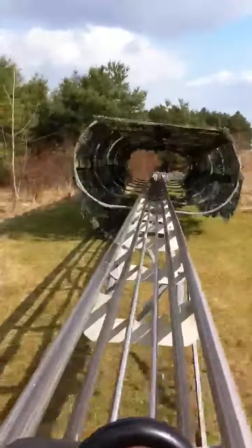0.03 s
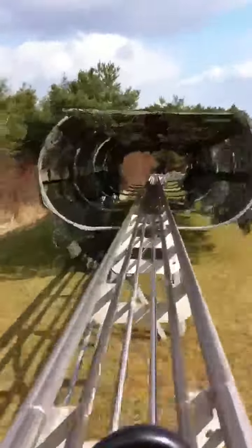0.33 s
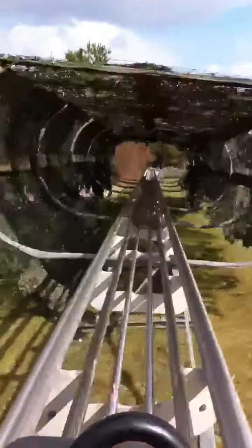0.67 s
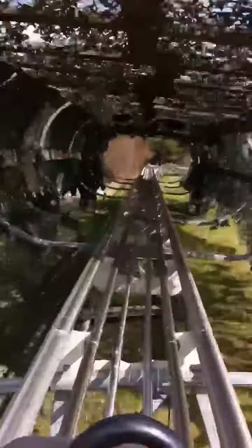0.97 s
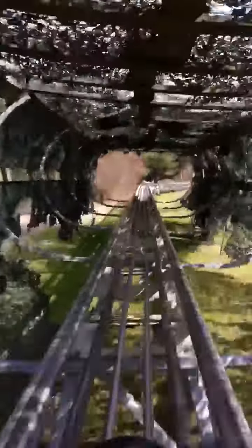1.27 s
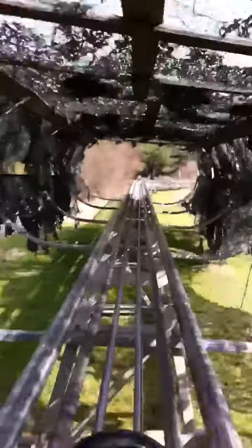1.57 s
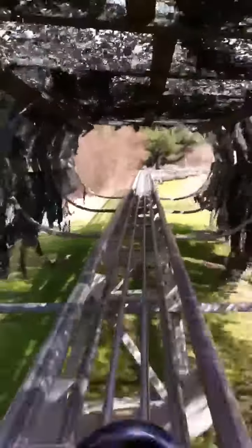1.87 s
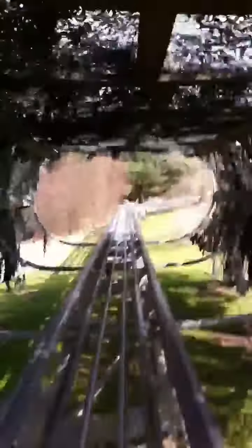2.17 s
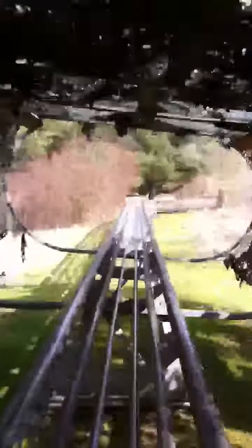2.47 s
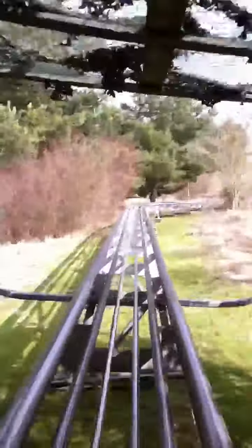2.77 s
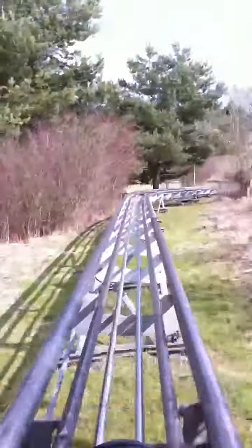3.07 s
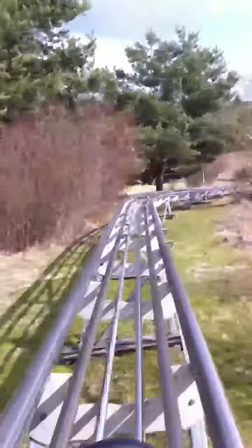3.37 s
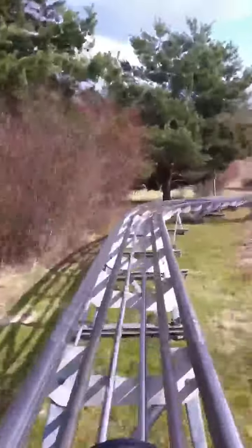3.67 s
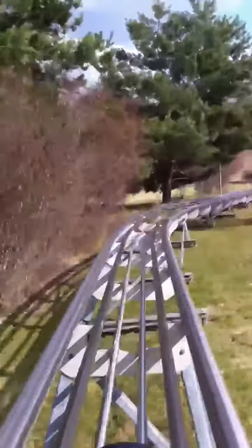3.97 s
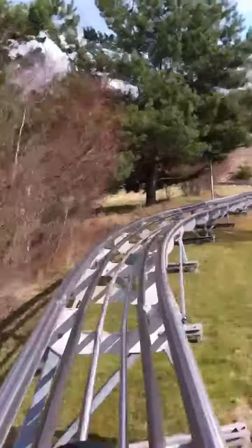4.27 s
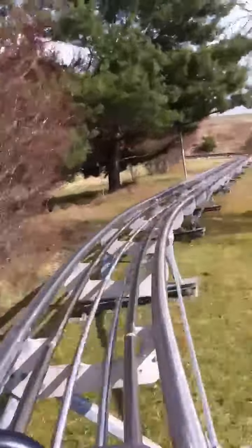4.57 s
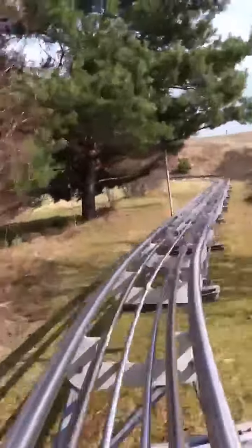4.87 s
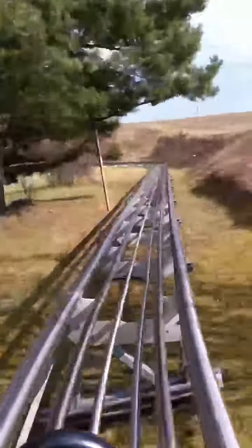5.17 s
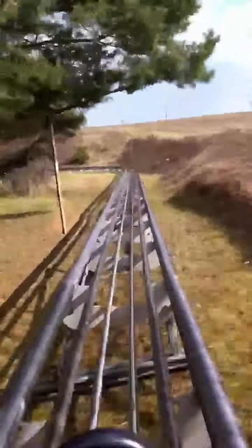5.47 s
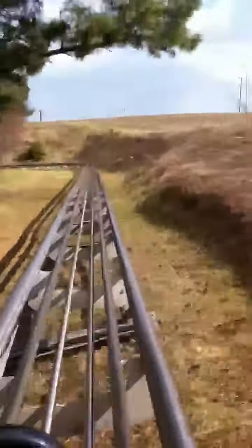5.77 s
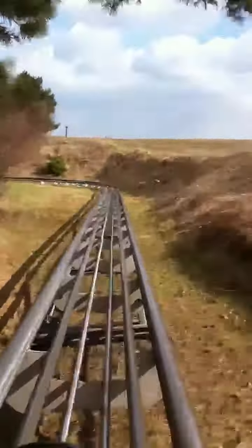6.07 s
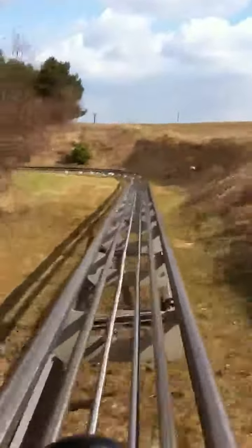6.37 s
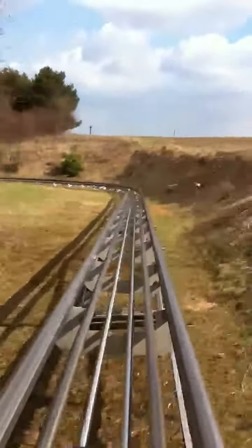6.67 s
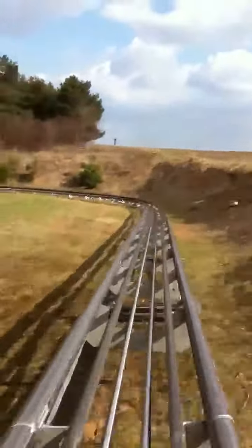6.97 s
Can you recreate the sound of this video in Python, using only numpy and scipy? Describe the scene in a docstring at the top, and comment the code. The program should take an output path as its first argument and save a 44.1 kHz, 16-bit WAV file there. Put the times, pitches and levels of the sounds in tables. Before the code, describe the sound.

Wheels roll along a metal track with a low droning rumble, irregular clacks, small rattles and a light rush of wind.

```python
"""A mountain-coaster sled runs on tubular steel rails, heard from the seat in the open air.
The wheels rumble through the chassis, swelling at each track support, and keep one low mode humming.
The airstream hisses and loose fittings rattle and tick. Bumps and rail joints knock the wheels,
metal pings and squeaks, and a brighter hiss comes and goes as the sled passes under tunnel netting."""
import sys
import numpy as np
from scipy import signal
from scipy.fft import rfft, irfft
from scipy.io import wavfile
from scipy.ndimage import uniform_filter1d

SR = 44100
rng = np.random.default_rng(int(sys.argv[2]) if len(sys.argv) > 2 else 0)


def waveform_to_disk(signal):
    """Save audio, clipped to [-1, 1], as 16-bit WAV at the path in sys.argv[1]."""
    frames = np.transpose(np.atleast_2d(signal))
    scaled = np.clip(frames, -1, 1) * 32767
    samples = np.round(scaled).astype(np.int16)
    wavfile.write(sys.argv[1], SR, samples)


N = 313551
TIME = np.arange(N) / SR

# wheel and chassis resonances: (centre [Hz], width [Hz], lift [dB])
BODY_MODES = [(570, 24, 5), (691, 71, 3.5), (830, 243, 12), (924, 31, 7), (1112, 79, 4.5), (1276, 110, 10),
              (1485, 83, 4.5), (1756, 27, 7), (1925, 66, 4.5), (2270, 110, 0.5), (2594, 100, 3.5),
              (4020, 280, 1.5), (4860, 96, 3.5), (5340, 87, 9)]
# spectrum of a hard contact: (frequency [Hz], gain [dB])
CRACK_SPECTRUM = [(1200, -23), (2500, -0.5), (3800, 14.5), (5500, 5.5), (7000, 5), (9500, 1.5),
                  (15000, -9.5)]


def undb(db):
    """Decibels to gain."""
    return 10 ** (np.asarray(db) / 20)


def unit(x):
    """Scale to rms 1."""
    return x / np.sqrt(np.mean(x ** 2))


def curve(table):
    """(time [s], value) rows interpolated per sample."""
    return np.interp(TIME, *np.transpose(table))


def walk(rate_hz):
    """Random steps, smoothed twice; rms 1."""
    hold = max(int(SR / rate_hz), 1)
    steps = np.repeat(rng.standard_normal(N // hold + 1), hold)
    return unit(uniform_filter1d(uniform_filter1d(steps, hold), hold)[:N])


def colour(x, spectrum, modes=()):
    """Minimum-phase filter of unit power: smooth spectrum plus resonances."""
    size = 8192
    bins_hz = np.maximum(np.fft.rfftfreq(size, 1 / SR), 1)
    hz, db = np.transpose(spectrum)
    octaves_outside = np.maximum(np.log2(hz[0] / bins_hz), 0) + np.maximum(np.log2(bins_hz / hz[-1]), 0)
    gain_db = np.interp(np.log(bins_hz), np.log(hz), db) - 12 * octaves_outside
    for centre_hz, width_hz, lift_db in modes:
        gain_db += lift_db / (1 + (2 * (bins_hz - centre_hz) / width_hz) ** 2)
    cepstrum = irfft(np.log(undb(gain_db)))[:size // 2]
    cepstrum[1:] *= 2
    response = irfft(np.exp(rfft(cepstrum, size)))
    return signal.fftconvolve(x, response / np.linalg.norm(response))[:N]


def impact(spectrum, modes=()):
    """Impulse response of a part; peak 1."""
    response = colour(np.ones(1), spectrum, modes)
    return response / np.abs(response).max()


def grains(rate_hz, spread_db):
    """Tiny impacts of unequal size at random times; rms 1."""
    sizes = undb(spread_db * np.clip(rng.standard_normal(N), -2, 2)) * rng.choice([-1, 1], N)
    return unit(sizes * (rng.random(N) < rate_hz / SR))


def bursts(times_s, levels_db, lengths_s, rise_s, overshoot):
    """Contact envelopes: strike, then decay; weak contacts rise more slowly."""
    power = np.zeros(N)
    for time_s, db, length_s in zip(times_s, levels_db, lengths_s):
        start = max(int(time_s * SR), 0)
        age_s = TIME[:min(SR // 4, N - start)]
        hardness = undb((db - max(levels_db)) / 2)
        attack = 1 - np.exp(-age_s * hardness / rise_s)
        strike = 1 + overshoot * hardness * np.exp(-age_s / .005)
        decay = np.exp(-.5 * (age_s / length_s) ** 2)
        power[start:start + len(age_s)] += (undb(db) * attack * strike * decay) ** 2
    return np.sqrt(power)


def even(x, span_s):
    """Hold the running rms at 1."""
    return x / np.sqrt(uniform_filter1d(x ** 2, max(int(span_s * SR), 2)) + 1e-12)


def hum(load):
    """Rolling sustains a low, nearly pure chassis mode; it flutters more when weak."""
    # hum strength: (time [s], relative level [dB])
    levels = [(0, -22.5), (.25, -25), (.55, -27), (.7, -31), (.95, -37.5), (1.25, -31), (1.55, -43),
              (1.8, -24.5), (2, -27), (2.1, -25), (2.4, -20), (3.7, -17.5), (4.7, -21), (5.5, -22),
              (5.68, -28.5), (6.1, -26), (7.11, -23)]
    # hum pitch: (time [s], frequency [Hz])
    pitches = [(0, 182.5), (.7, 187.3), (2.2, 184.5), (3, 185.6), (4.5, 185.2), (7.1, 186.2)]
    level_db = curve(levels)
    phase = 2 * np.pi * np.cumsum(curve(pitches) + .5 * walk(24.6)) / SR
    flutter_db = (.23 + .095 * (-10.5 - level_db)) * walk(35)
    return np.sqrt(2) * np.sin(phase) * undb(level_db - .24 + flutter_db) * load


def rumble(load):
    """Uneven rails shake the chassis, harder at each evenly spaced track support."""
    # chassis shaking: (time [s], relative level [dB])
    shake = [(0.0, -35), (0.59, -32), (0.73, -33.5), (1.84, -35.5), (2.06, -31.5), (2.49, -31.5),
             (2.97, -33.5), (3.25, -31), (4.47, -33.5), (4.75, -32.5), (5.27, -32), (5.54, -32),
             (6.46, -34), (7.11, -33.5)]
    # deep chassis boom: (frequency [Hz], gain [dB])
    boom_spectrum = [(25, -43), (42, -18), (65, -20), (95, -9), (128, -1.5), (160, 1.5), (190, -3),
                     (300, -38.5)]
    # shell vibration: (frequency [Hz], gain [dB])
    shell_spectrum = [(110, -22), (170, 2), (210, 2.5), (260, -1), (340, -6), (450, -10), (560, -12.5),
                      (700, -21.5), (1500, -52.5)]
    first_support_s, spacing_s, half_width_s = .277, .41, .011
    from_support_s = (TIME - first_support_s + spacing_s / 2) % spacing_s - spacing_s / 2
    swell_db = 7.5 * np.exp(-(from_support_s / half_width_s) ** 2)
    shake_db = curve(shake)
    boom_db = -32.5 + 2.7 * (shake_db + 32) + swell_db
    shell_db = shake_db + 4 + .25 * swell_db
    jolts = undb(walk(30)) * np.sqrt(load)
    boom = colour(rng.standard_normal(N), boom_spectrum)
    shell_modes = [(187, 27, -4.5), (374, 48, 2.5)]  # thinned near the hum's pitch so the hum stays clear
    shell = colour(grains(rate_hz=1500, spread_db=3), shell_spectrum, shell_modes)
    return jolts * (boom * undb(boom_db) + shell * undb(shell_db))


def wheels(roar_db):
    """Rail grit rings wheels and chassis, pulsing once a turn where a wheel presses harder."""
    # rolling roar: (frequency [Hz], gain [dB])
    spectrum = [(250, -31), (500, 9), (700, -0.5), (900, -2), (1010, -4.5), (1400, -4), (2300, -5),
                (3000, -14), (5200, -16.5), (6200, -23), (15000, -58)]
    turn_hz = 17 * (1 + .1484 * walk(6))
    throb_db = np.interp(TIME, [4, 6], [.9, 2]) * np.sin(2 * np.pi * np.cumsum(turn_hz) / SR)
    grit = grains(rate_hz=6000, spread_db=1.5) * undb(roar_db - .16 + throb_db + 1.56 * walk(60))
    return colour(grit, spectrum, BODY_MODES)


def airstream(roar_db):
    """Passing air hisses and flutters; its level follows the wheel roar."""
    # air hiss: (frequency [Hz], gain [dB])
    spectrum = [(1000, -26), (3000, 1), (5200, -12.5), (6500, -3.5), (9000, -7.5), (12300, -8),
                (15500, -17)]
    hiss = colour(grains(rate_hz=24000, spread_db=-2), spectrum)
    level_db = -55.5 + 1.57 * (roar_db + 34.5)
    return hiss * undb(level_db + 2 * walk(25))


def rattles():
    """Loose fittings chatter in short fits, with faint stray clicks between."""
    # fits of chatter: (time [s], level [dB], length [s])
    fits = [(0.011, -44.5, 0.0081), (0.116, -45.5, 0.018), (0.452, -44.5, 0.019), (0.495, -43.5, 0.015),
            (0.848, -48, .01), (2.294, -40, 0.0084), (2.338, -44, 0.017), (2.738, -42, 0.012),
            (2.765, -44.5, 0.027), (3.414, -47, 0.021), (4.094, -51, .035), (4.355, -46, 0.049),
            (5.623, -47.5, .02), (5.728, -41.5, 0.014), (6.002, -43, 0.013), (6.386, -55, .02)]
    clicks = even(grains(rate_hz=1500, spread_db=3), span_s=.02)
    chatter = clicks * bursts(*np.transpose(fits), rise_s=.0003, overshoot=.52)
    strays = grains(rate_hz=45, spread_db=6.5) * undb(-62)
    return colour(chatter + strays, CRACK_SPECTRUM)


def ticks():
    """Small hard parts tick and buzz briefly, some dull, some with a bright snap."""
    # touches of fittings: (time [s], relative level [dB], snap re click [dB])
    touches = [(.0933, -21, 7), (.1572, -29, -6), (0.297, -20.5, -10), (.3673, -30, -14), (.3993, -32, 7),
               (.459, -33, -8), (.488, -29, -18), (.4991, -34, -9), (.555, -35, -18), (0.593, -19, -5),
               (.6134, -24, 2), (0.688, -31, -18), (.8805, -33, -22), (1.0128, -23.5, -13),
               (1.0256, -29, -6), (1.076, -31, -17), (1.1821, -24.5, -17), (1.346, -29, 2),
               (1.4012, -22.5, 8), (2.0919, -21.5, -14), (2.1678, -31, -15), (2.1898, -23.5, 7),
               (2.1993, -27, 3), (2.2923, -20, -8), (2.2941, -22, -6), (2.2985, -22, -8),
               (2.3613, -29, -14), (2.7451, -28, -12), (3.4009, -26, -17), (3.5122, -29, -20),
               (3.5592, -27, -7), (3.5688, -32, -3), (3.6254, -20.5, 4), (3.629, -26, 2),
               (3.8708, -30.5, 2), (4.2044, -25, -6), (4.257, -25, -13), (4.3937, -27.5, -16),
               (5.0102, -26.5, -13), (5.1402, -24, -10), (5.1993, -29, -13), (5.5087, -29, -14),
               (5.6501, -29, -14), (5.7193, -20, -12), (5.8754, -23, 1), (5.9976, -26, -1),
               (6.0098, -30, -10), (6.1528, -28, -18), (6.3913, -28, -26), (6.4121, -29, -28),
               (6.4148, -30, -26)]
    # dull click: (frequency [Hz], gain [dB])
    click_spectrum = [(900, -12), (2000, 1), (3000, -2.5), (4200, 1.5), (5500, -5.5), (7000, -16),
                      (11000, -26), (15000, -44)]
    # bright snap: (frequency [Hz], gain [dB])
    snap_spectrum = [(5800, -23), (7500, 0), (8600, -5), (9900, 2), (12000, -6.5), (13000, -7.5),
                     (15500, -19)]
    pitch_scatter, buzz_db, buzz_decay_s = .056, -17, .0023
    out, age_s = np.zeros(N + SR), TIME[:SR // 60]
    for time_s, db, snap_db in touches:
        jitter = rng.uniform(-1.2, 1, len(age_s))
        detune = [1 + pitch_scatter * jitter[0], 1]
        click = impact(np.multiply(click_spectrum, detune))
        snap = impact(np.multiply(snap_spectrum, detune))
        part = click + undb(snap_db) * snap
        force = (age_s == 0) + undb(buzz_db) * jitter * np.exp(-age_s / buzz_decay_s)
        tick = signal.fftconvolve(part / np.abs(part).max(), force)
        start = int(time_s * SR)
        out[start:start + len(tick)] += undb(db + 2) * tick
    return out[:N]


def contacts():
    """Wheel blows, one per bump, three per joint: front strike, front bounce, rear strike."""
    # rail bumps, relative levels: (time [s], thud [dB], clang [dB], knock [dB])
    bumps = [(0.331, -16, -56, -36), (.365, -16.5, -37, -22), (.403, -12.5, -35, -31),
             (1.097, -33, -28.5, -30), (1.183, -17, -33.5, -26), (1.775, -22, -28.5, -22),
             (1.867, -15.5, -32, -26), (2.186, -9, -36, -17.5), (2.2211, -9, -42, -14),
             (2.504, -13, -52, -20), (3.15, -12.5, -45, -32), (3.2, -23, -40, -26), (3.882, -18, -33, -26),
             (4.768, -33, -26.5, -25), (4.876, -13, -39, -14.5), (4.9052, -17.5, -31, -17),
             (5.2087, -21, -36, -20), (5.878, -16.5, -26.5, -27), (6.19, -38, -33, -18),
             (6.561, -16, -29, -17), (7.0215, -39, -31, -16), (7.076, -28, -29.5, -22)]
    # rail joints, relative levels: (time [s], thud [dB], clang [dB], knock [dB],
    # bounce delay [s], bounce thud [dB], bounce clang [dB], bounce knock [dB],
    # rear clang [dB], ring re clang [dB], chatter length [s])
    joints = [(0.582, -10, -20, -8.5, 0.027, -13.5, -21.5, -10.5, -28.5, -0.5, 0.015),
              (1.2705, -13, -23.5, -12, 0.029, -21, -17.5, -11, -26.5, -3, 0.024),
              (1.955, -13.5, -32, -23, .04, -29, -20.5, -20, -31.5, 3, 0.021),
              (2.637, -14.5, -23.5, -21, .022, -25, -23.5, -20, -27.5, -6, 0.02),
              (3.309, -19, -28, -16, 0.012, -37, -37, -25, -32, 3.5, 0.017),
              (4.657, -23.5, -28, -23, 0.035, -36, -48, -29, -31, 1.5, 0.017),
              (5.546, -14.5, -21, -15, 0.023, -21, -23.5, -10.5, -32.5, -10, 0.02)]
    rear_lag_s = .101
    # (time [s], thud [dB], clang [dB], knock [dB], ring [dB], crack [dB], length [s])
    rows = [(time_s, thud, clang, knock, clang - 12, clang - 21, .012)
            for time_s, thud, clang, knock in bumps]
    for (time_s, thud, clang, knock, bounce_s, bounce_thud, bounce_clang, bounce_knock,
         rear_clang, ring, length_s) in joints:
        strike = (time_s, thud, clang, knock, clang + ring, clang - 21, length_s)
        bounce = (time_s + bounce_s, bounce_thud, bounce_clang, bounce_knock,
                  bounce_clang + ring, bounce_clang - 12.5, length_s)
        rear = (time_s + rear_lag_s, rear_clang + 5.5, rear_clang, knock - 8.5,
                rear_clang + ring, rear_clang - 21, length_s)
        rows += [strike, bounce, rear]
    return rows


def pushes(times_s, levels_db):
    """The hardest push of each contact: one impulse just after first touch."""
    delay_s = .004007
    out = np.zeros(N)
    out[np.minimum(((times_s + delay_s) * SR).astype(int), N - 1)] = undb(levels_db)
    return out


def sway(times_s, levels_db):
    """The frame swings for a few cycles after a blow."""
    sway_hz, peak_s = 137.4, .01
    out, age_s = np.zeros(N + SR), TIME[:SR // 6]
    envelope = age_s / peak_s * np.exp(1 - age_s / peak_s)
    swing = np.sqrt(2) * np.sin(2 * np.pi * sway_hz * age_s) * envelope
    for time_s, db in zip(times_s, levels_db):
        start = int(time_s * SR)
        out[start:start + len(age_s)] += undb(db) * swing
    return out[:N]


def blows():
    """Wheels hit bumps and joints: the chassis thuds and clangs, the rail rings, the contact cracks."""
    # chassis thud: (frequency [Hz], gain [dB])
    thud_spectrum = [(100, -31.5), (160, -2.5), (210, 10), (280, 3), (420, -8.5), (600, -16.5), (1500, -42)]
    # single hard knock: (frequency [Hz], gain [dB])
    knock_spectrum = [(110, -12), (200, -0.5), (300, 1.5), (450, -1.5), (800, -15), (1500, -21.5),
                      (3000, -42), (6000, -51)]
    # chassis clang: (frequency [Hz], gain [dB])
    clang_spectrum = [(200, -16), (300, 7.5), (500, 6.5), (800, 7.5), (1020, 4), (1650, 0.5), (2400, -7),
                      (3200, 1), (7000, -15)]
    # struck steel rail: (frequency [Hz], gain [dB])
    rail_spectrum = [(600, -8), (1100, 5), (1800, 6), (2800, -6.5), (5500, -19), (9000, -29)]
    # rail resonances: (centre [Hz], width [Hz], lift [dB])
    rail_modes = [(1115, 84, 15.3), (1297, 85, 10), (1543, 71, 15.4), (1770, 50, 9), (2200, 90, 12),
                  (2460, 58, 10.5), (2640, 60, 15), (2890, 46, 17), (5150, 100, 18)]
    times_s, thud_db, clang_db, knock_db, ring_db, crack_db, lengths_s = np.transpose(contacts())
    shell = even(colour(rng.standard_normal(N), thud_spectrum), span_s=.03)
    thud = shell * bursts(times_s, thud_db, lengths_s, rise_s=.00095, overshoot=.28)
    boom = sway(times_s, thud_db + .66 * clang_db + 9)  # strong only if a blow is both heavy and hard
    knock = signal.fftconvolve(pushes(times_s, knock_db), impact(knock_spectrum, BODY_MODES))[:N]
    chatter = even(grains(rate_hz=3000, spread_db=4), span_s=.005)
    clang_force = chatter * bursts(times_s, clang_db, lengths_s, rise_s=.001, overshoot=.5)
    ring_force = chatter * bursts(times_s, ring_db, lengths_s / 2, rise_s=.001, overshoot=.5)
    crack_force = chatter * bursts(times_s, crack_db, lengths_s, rise_s=.0006, overshoot=.5)
    clang = colour(clang_force, clang_spectrum, BODY_MODES)
    ring = colour(ring_force + pushes(times_s, ring_db + 22), rail_spectrum, rail_modes)
    crack = colour(crack_force, CRACK_SPECTRUM, BODY_MODES)
    return knock + boom + undb(-4.5) * thud + undb(-3) * clang + undb(-7.5) * ring + undb(-1.5) * crack


def metal_pings():
    """Brief wavering metal pings, clinks and squeaks."""
    # short metal notes: (time [s], pitch [Hz], level [dB], length [s])
    pings = [(0.847, 3670, -46, 0.009), (1.27, 1490, -28.5, 0.013), (1.318, 2300, -31.5, 0.014),
             (1.959, 1487, -30, 0.0092), (1.995, 1733, -25, 0.0073), (1.995, 2950, -35, .007),
             (1.997, 1150, -27.5, .007), (1.994, 5480, -41, 0.023), (4.778, 1243, -26.5, 0.009),
             (5.579, 900, -24, 0.0063), (6.388, 3050, -44, .008), (6.409, 2580, -39, .008),
             (6.41, 3360, -38, 0.0066), (6.41, 1286, -34, .01), (6.502, 830, -28, 0.016),
             (6.925, 800, -30.5, .013), (6.974, 806, -29, 0.013), (7.021, 820, -22.5, 0.011)]
    out = np.zeros(N)
    for time_s, hz, db, length_s in pings:
        phase = 2 * np.pi * np.cumsum(hz * (1 + .028 * walk(500))) / SR
        envelope = bursts([time_s], [db], [length_s], rise_s=.0015, overshoot=0)
        out += np.sqrt(2) * np.sin(phase) * envelope
    return out


def tunnel():
    """Bright hiss sets in under the tunnel netting and fades past the exit."""
    # hiss under the netting: (frequency [Hz], gain [dB])
    spectrum = [(1500, -4), (2700, 5.5), (4000, 2.5), (6500, -1.5), (9000, -5), (12300, -4.5),
                (15500, -10.5)]
    entry_s, attack_s, exit_s, release_s = 1.24, .18, 3, .56
    inside = np.interp(TIME, [entry_s, entry_s + attack_s, exit_s, exit_s + release_s], [0, 1, 1, 0])
    return colour(rng.standard_normal(N), spectrum) * inside * undb(-51.5 + .5 * walk(6.46))


def scene():
    """Mono mix at the seat; open ground adds no echo."""
    # wheel roar: (time [s], relative level [dB])
    roar = [(0.0, -35), (0.83, -39), (1.76, -37.5), (2.55, -36), (4.0, -37.5), (4.47, -35.5), (5.17, -36.5),
            (6.63, -35), (6.97, -35.5), (7.11, -33.5)]
    # wheels press harder or go light, moving the low sounds: (time [s], half width [s], change [dB])
    load_changes = [(2.12, 0.033, -2.5), (2.275, .015, 0), (2.576, 0.012, 8.5), (2.615, 0.017, -4.5),
                    (3.205, 0.018, 8), (3.365, 0.034, -3.5), (4.843, 0.045, -17.5), (5.10, 0.035, -10),
                    (5.365, 0.039, -6), (6.55, 0.03, -8)]
    roar_db = curve(roar)
    load = undb(sum(db * np.exp(-((TIME - time_s) / half_width_s) ** 2)
                    for time_s, half_width_s, db in load_changes))
    rolling = hum(load) + rumble(load) + wheels(roar_db)
    hiss = airstream(roar_db) + tunnel()
    return (rolling + hiss + blows() + metal_pings() + rattles() + ticks())[None]


def record(dry):
    """Thin the deep bass and cut the top."""
    low_cut_hz, high_cut_hz = 65, 15750
    thinned = signal.sosfilt(signal.butter(3, low_cut_hz, "high", fs=SR, output="sos"), dry)
    return signal.sosfilt(signal.ellip(10, .2, 80, high_cut_hz, fs=SR, output="sos"), thinned)


dry = scene()
out = record(dry)
waveform_to_disk(out)
```